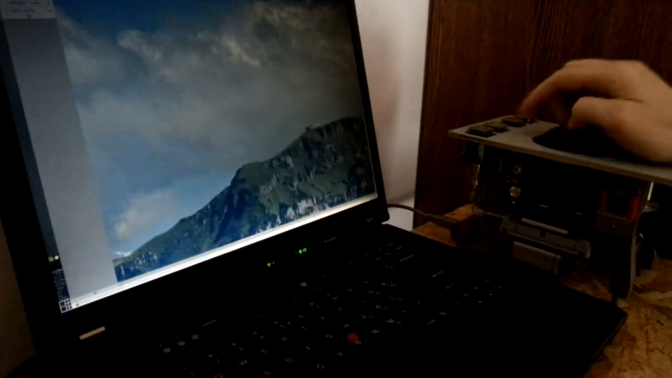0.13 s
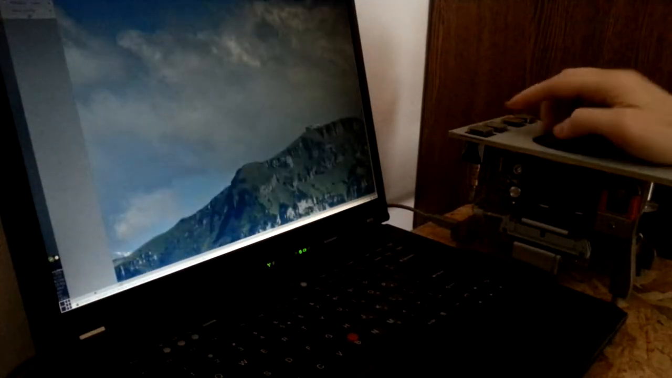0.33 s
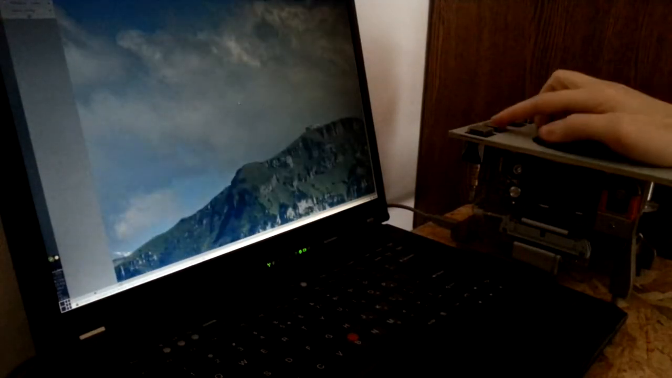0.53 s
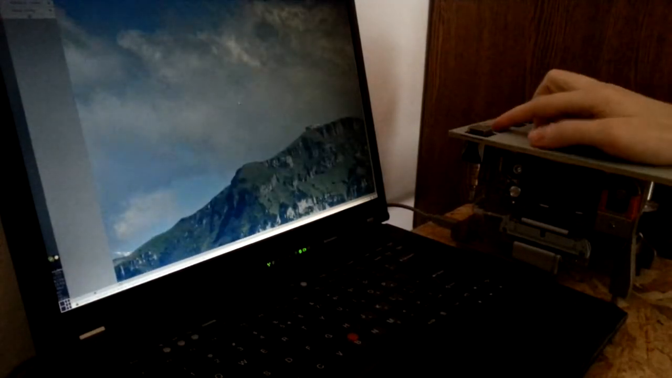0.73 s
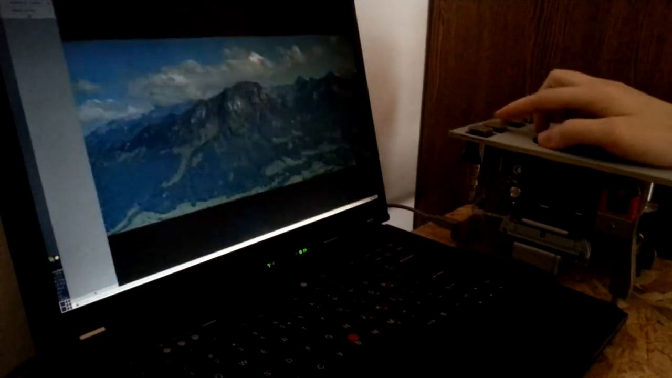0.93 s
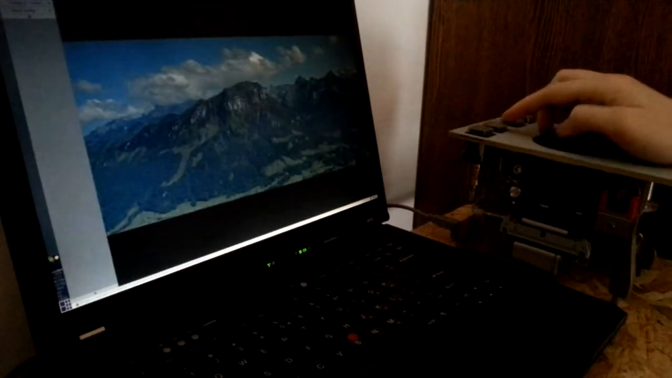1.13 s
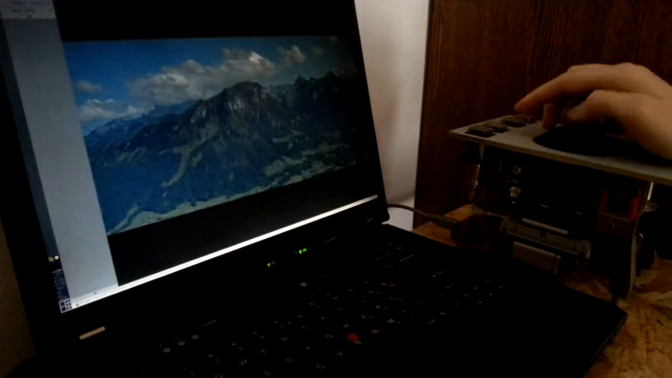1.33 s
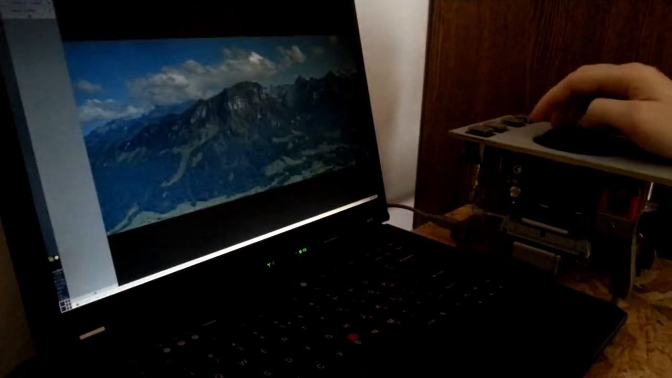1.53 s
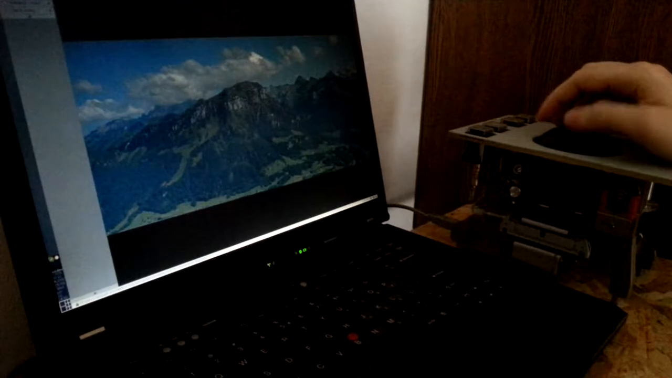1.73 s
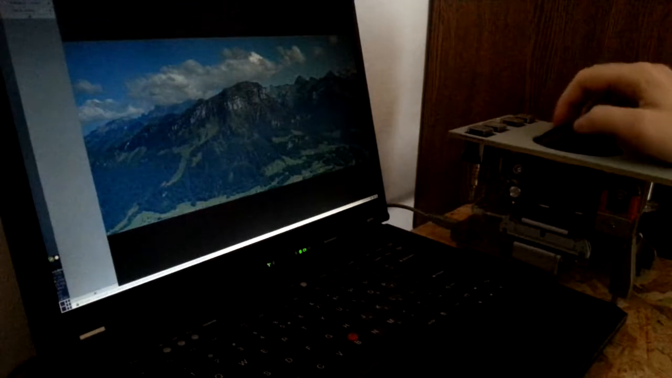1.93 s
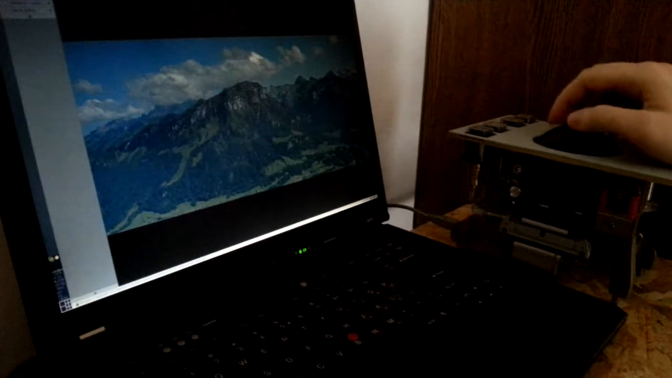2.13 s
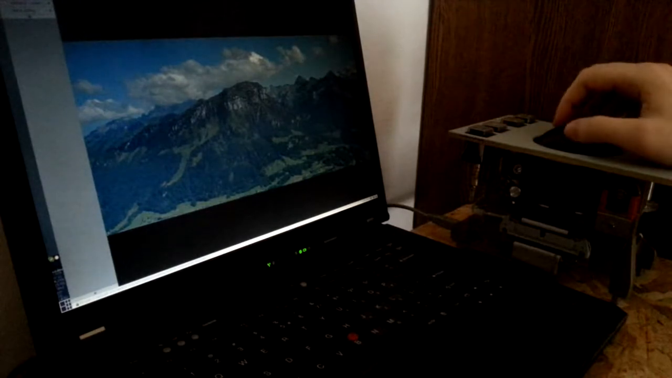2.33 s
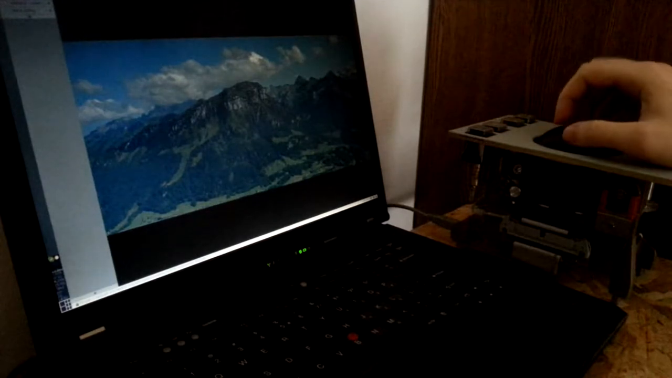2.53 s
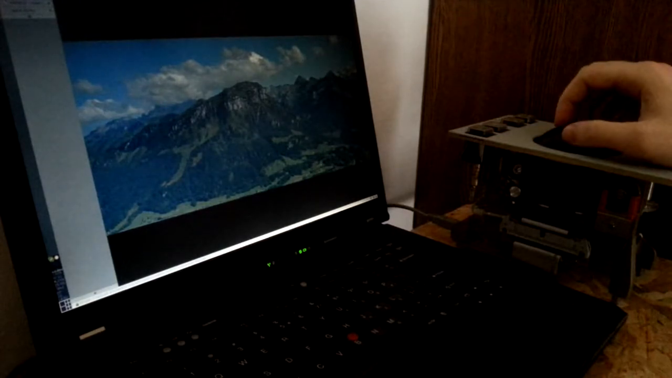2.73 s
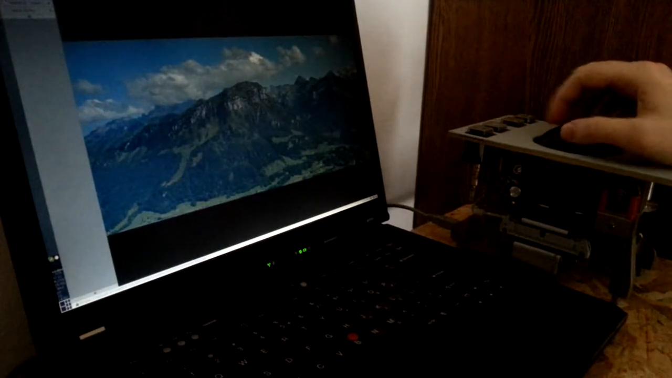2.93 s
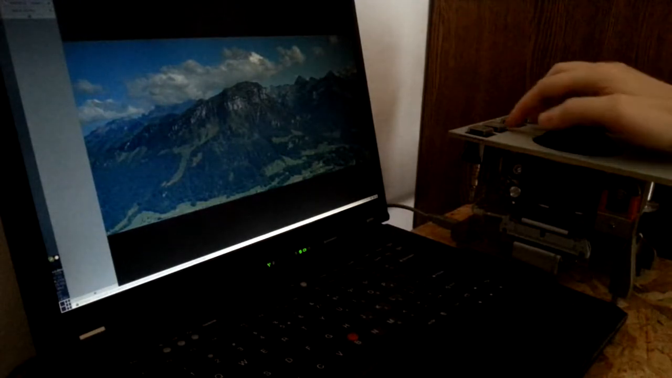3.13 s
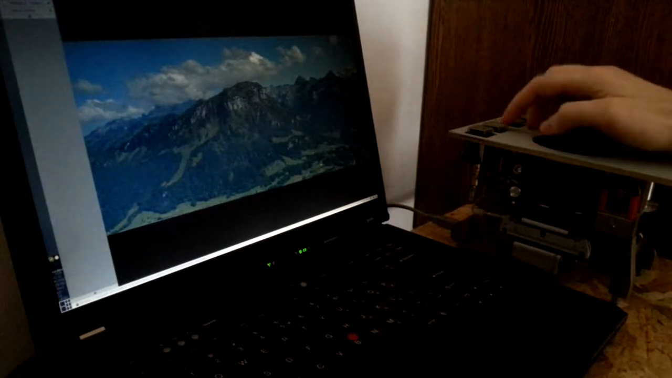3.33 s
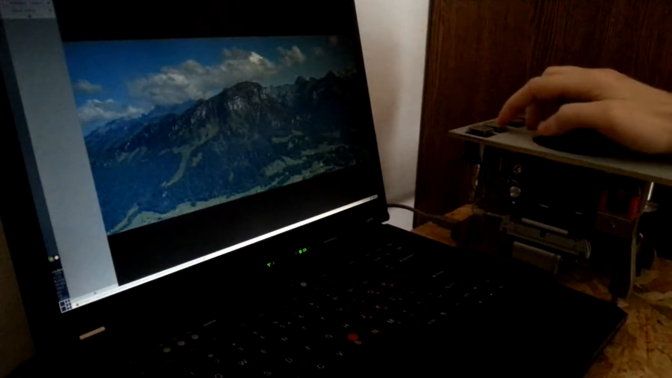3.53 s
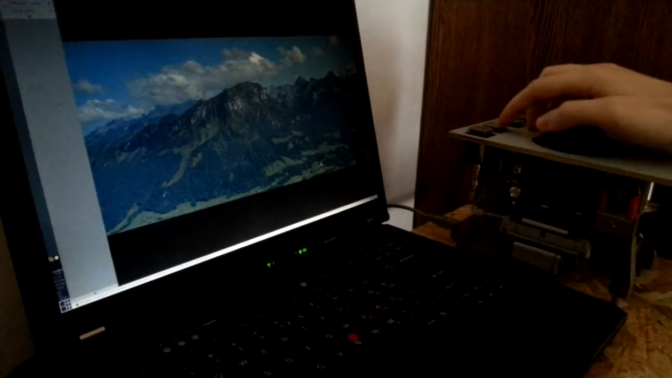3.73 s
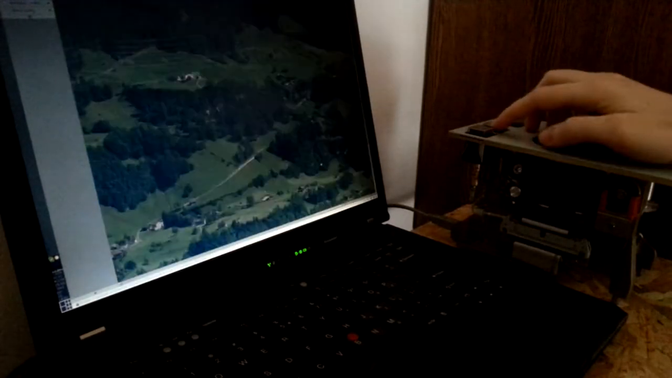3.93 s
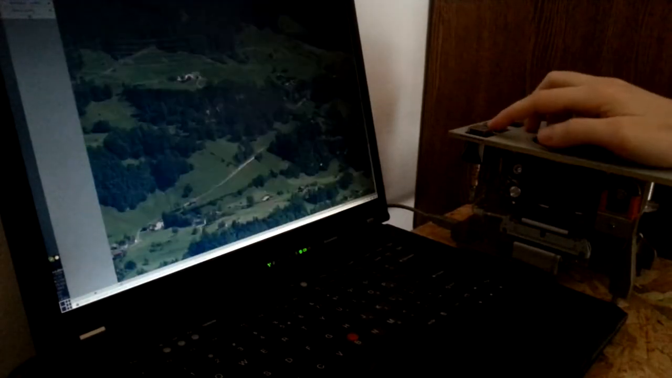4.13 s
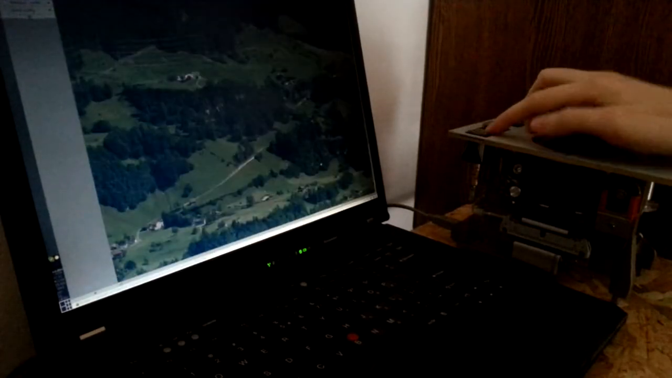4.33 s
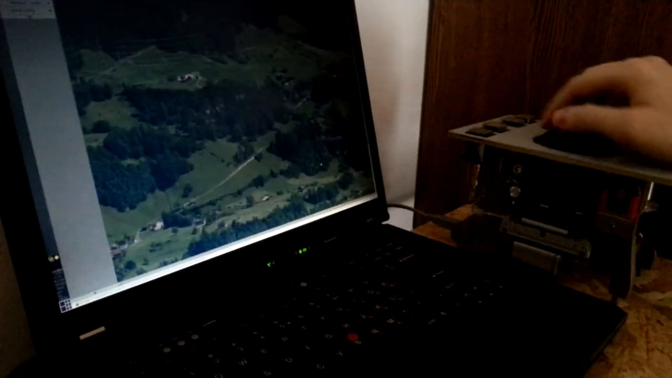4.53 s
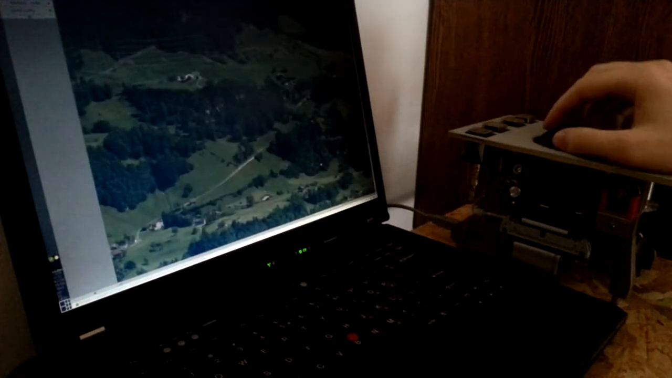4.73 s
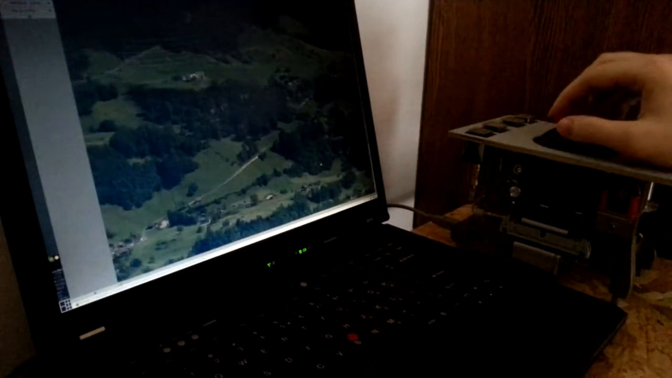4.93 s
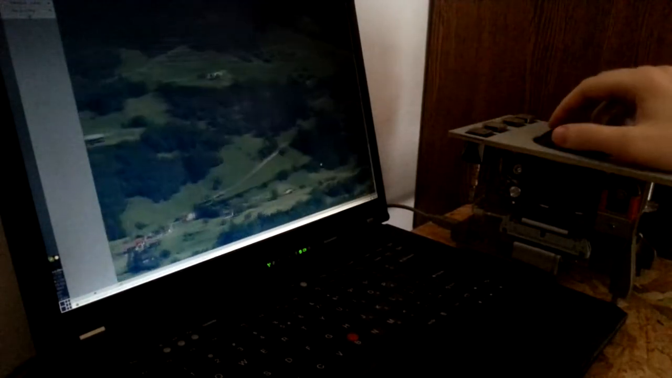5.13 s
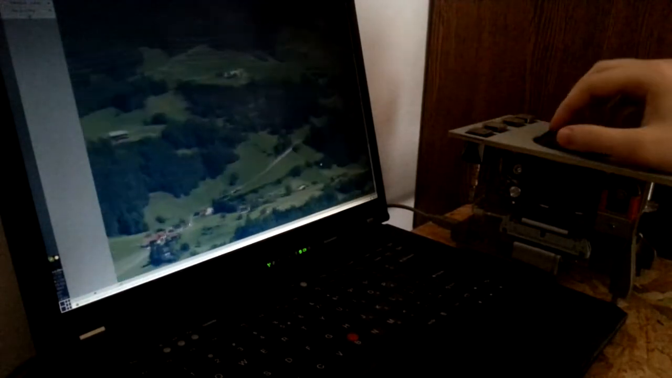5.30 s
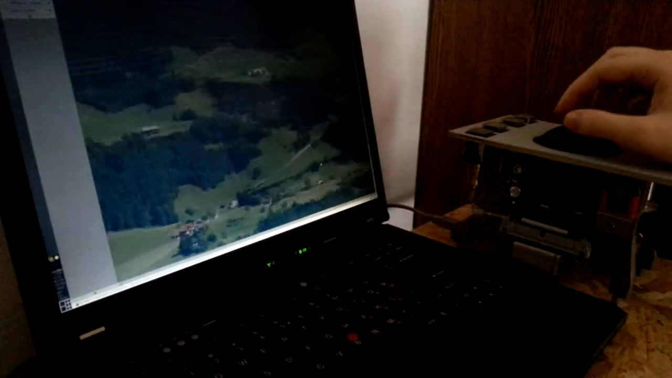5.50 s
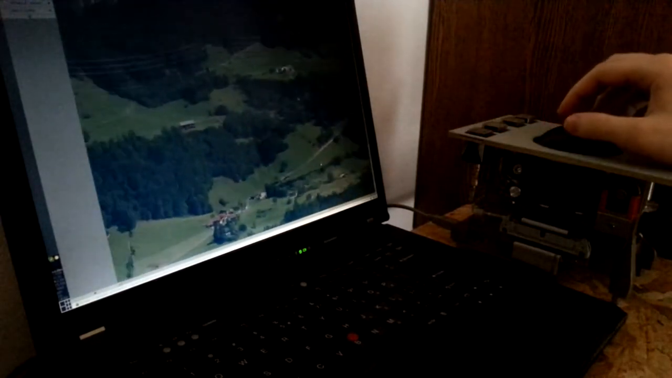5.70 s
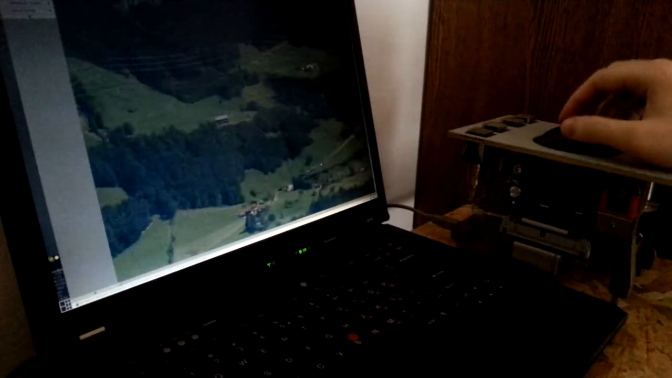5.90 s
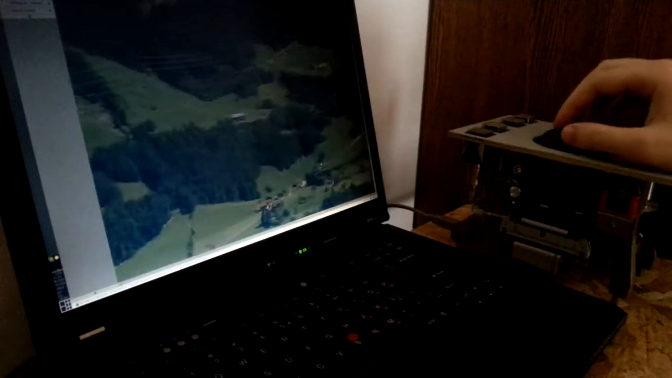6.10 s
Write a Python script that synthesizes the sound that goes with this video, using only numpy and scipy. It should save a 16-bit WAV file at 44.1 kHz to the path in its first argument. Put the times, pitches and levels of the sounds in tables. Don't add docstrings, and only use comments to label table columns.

```python
import sys
import numpy as np
from scipy import signal
from scipy.fft import rfft, irfft
from scipy.io import wavfile
from scipy.ndimage import uniform_filter1d

SR = 44100
rng = np.random.default_rng(int(sys.argv[2]) if len(sys.argv) > 2 else 0)


def materialize(psi):
    bounded = np.clip(np.atleast_2d(psi).T, -1, 1)
    quanta = np.round(bounded * 32767).astype(np.int16)
    wavfile.write(sys.argv[1], SR, quanta)


def magnitude_from_level(level_db):
    exponent = np.asarray(level_db, float) / 20
    return 10 ** exponent


N = 271656

# (frequency [Hz], width [Hz], level [dB])
DESK_MODES = [(165.2, 19.6, -1.5), (196, 12.2, 1), (132.6, 39, -12)]
# (frequency [Hz], width [Hz], level [dB])
PLATE_MODES = [(318.5, 15.6, 4), (353, 39.5, -0.5), (392.5, 14, -7.5), (432, 22, -6), (492, 34, -10.5),
               (532, 36, -15), (547, 39, -22.5), (662, 35, -20)]


def unit(x):
    return x / np.sqrt(np.mean(x ** 2))


def colour(x, points):
    hz, db = np.transpose(points)
    axis_hz = np.maximum(np.fft.rfftfreq(x.shape[-1], 1 / SR), 1)
    gain_db = np.interp(np.log(axis_hz), np.log(hz), db)
    return irfft(rfft(x) * magnitude_from_level(gain_db), x.shape[-1])


def walk(rate_hz):
    hold = int(SR / rate_hz)
    steps = np.repeat(rng.standard_normal(N // hold + 1), hold)
    slewed = uniform_filter1d(uniform_filter1d(steps, hold), hold)
    return unit(slewed[:N])


def swell(t, ms):
    rise = t * 1000 / max(ms, .2)
    return rise * np.exp(1 - rise)


def chatter(count, size):
    return unit(uniform_filter1d(rng.standard_normal(count), size=size))


def add(out, s, hit):
    start = int(s * SR)
    out[:, start:start + hit.shape[1]] += hit


def hiss():
    # (frequency [Hz], density [dB per Hz])
    hiss_shape = [(15, -53), (25, -23), (70, -7), (150, -1), (254, -5.5), (600, -5.5), (1280, -10.5),
                  (2500, -13), (4000, -14), (5300, -9.5), (6500, -14), (9000, -16), (12000, -18),
                  (15700, -18)]
    hiss_db, whine_hz, whine_db = -48.5, 7308, -66
    notch_hz, notch_width_hz, notch_db = 3980, 150, -4
    mid, side = rng.standard_normal((2, N))
    side = colour(side, [(40, -6), (130, -5.5), (300, -0.5), (1000, 0.5)])
    floor = colour(np.array([mid + side, mid - side]), hiss_shape)
    floor = colour(floor, [(notch_hz - notch_width_hz, 0), (notch_hz, notch_db), (notch_hz + notch_width_hz, 0)])
    floor *= magnitude_from_level(hiss_db) / np.std(floor.mean(axis=0))
    whine = np.sin(2 * np.pi * whine_hz * np.arange(N) / SR) * magnitude_from_level(whine_db + 2.0 * walk(4.3))
    return floor + whine


def strokes(t):
    # (start [s], length [s], level [dB], change over the stroke [dB], plate re desk [dB])
    stroke_rows = [(0.071, 0.34, -37, -6.5, 0), (0.955, .12, -48.5, 1, 1), (1.085, 0.34, -40.5, 4, 1),
                   (1.533, 0.35, -40.5, -2, -1), (1.912, .45, -32, -9, 1), (2.415, 0.33, -32, -9, 1),
                   (3.136, 0.18, -45, -6.5, 2.5), (4.606, .05, -43, -7, 5.5),
                   (4.698, 0.086, -45.5, 5.5, -4.5), (4.766, 0.46, -34.5, -15, 0.5),
                   (5.26, 0.56, -32, -5, 0), (5.857, 0.2, -38.5, -10, -1.5), (6.044, 0.14, -35.5, 7.5, -3)]
    push_s, coast_s, coast_db = 0.041, 0.048, -20
    desk, plate = 0, 0
    for s, length_s, db, change_db, plate_db in stroke_rows:
        push = np.clip((t - s) / push_s, 0, 1)
        drift_db = change_db * np.clip((t - s) / length_s, 0, 1)
        after = np.maximum(t - s - length_s, 0) / coast_s
        gain = push * magnitude_from_level(db + drift_db + np.maximum(coast_db * after, -200))
        desk = desk + gain
        plate = plate + gain * magnitude_from_level(plate_db)
    return desk, plate


def pits():
    pits_per_s, pit_db, scatter_db, pit_plate_db = 22, 3, 3, -2
    chance = rng.standard_normal((200, 3))
    s = np.cumsum(np.exp(.3 * chance[:, 0])) / pits_per_s
    desk, plate = strokes(s)
    desk_db = 20 * np.log10(desk + 1e-9) + pit_db + scatter_db * chance[:, 1]
    plate_db = 20 * np.log10((plate + 1e-9) / (desk + 1e-9)) + pit_plate_db + scatter_db * chance[:, 2]
    return [row for row in zip(s, desk_db, plate_db) if row[0] < N / SR and row[1] > -70]


def bumps():
    # (time [s], desk peak [dB], plate re desk [dB])
    deep_dents = [(.125, -38, 7.5), (.15, -30, -3), (.189, -36.5, 6), (.28, -26, -4), (1.266, -37, 7),
                  (1.33, -30, -5), (1.404, -25, -7), (1.571, -32, -17), (1.727, -38, 5.5), (1.924, -30, 0),
                  (2.072, -32, -2), (2.108, -24, -6), (2.145, -27, -9), (2.177, -30.5, 2.5),
                  (2.438, -32, 9), (2.474, -24, -2), (2.512, -23.5, -15), (2.768, -36, -14),
                  (3.139, -31.5, -7), (3.192, -38, -15), (3.272, -43, 8), (3.391, -28, -8.5),
                  (4.814, -24.5, -3), (4.848, -30, -2), (5.045, -28, -1.5), (5.367, -29, -7),
                  (5.424, -30.5, 7), (5.457, -24, 0), (5.712, -20.5, -11), (6.125, -23.5, -7.5)]
    desk_swell_ms, plate_swell_ms, bumps_db = 9.5, 7, -1.5
    out, t = np.zeros(N + SR), np.arange(SR // 10) / SR
    dents = deep_dents + pits()
    phases = rng.random((250, 2, 8, 1))
    for (s, desk_db, plate_db), (desk_phase, plate_phase) in zip(dents, phases):
        start = int(s * SR)
        bodies = ((DESK_MODES, desk_db, desk_swell_ms, desk_phase),
                  (PLATE_MODES, desk_db + plate_db, plate_swell_ms, plate_phase))
        for modes, db, ms, phase in bodies:
            hz, _, mode_db = (c[:, None] for c in np.transpose(modes))
            partials = magnitude_from_level(mode_db) * np.sin(2 * np.pi * (hz * t + phase[:len(hz)]))
            tone = np.sum(partials, axis=0) * swell(t, ms)
            out[start:start + len(t)] += magnitude_from_level(db + bumps_db) * tone / np.max(np.abs(tone))
    return out[:N]


def ring(x, modes):
    out = 0
    for k, (hz, width_hz, db) in enumerate(modes):
        pole = np.exp((2j * np.pi * hz - np.pi * width_hz) / SR)
        mode = signal.lfilter([1], [1, -pole], x).imag
        out = out + (-1) ** k * magnitude_from_level(db) * width_hz * mode
    return unit(out)


def ball():
    # (frequency [Hz], width [Hz], level [dB])
    bearing_modes = [(1108, 40, 6.2), (1185, 65, 9.5), (1325, 97, 5.9), (1437, 50, 11.6), (1700, 430, 0.4)]
    bump_hz, bump_db, rough_db = 29.82, -0.5, -5
    whirr_db, left_db = -20.5, -2.2
    force = rng.standard_normal(N) * magnitude_from_level(bump_db * walk(bump_hz))
    desk, plate = strokes(np.arange(N) / SR)
    rolling = desk * magnitude_from_level(rough_db) * ring(force, DESK_MODES)
    rolling += plate * magnitude_from_level(rough_db) * ring(force, PLATE_MODES)
    rolling += plate * magnitude_from_level(whirr_db + 3.06 * walk(45)) * ring(force, bearing_modes)
    return (rolling + bumps()) * magnitude_from_level(np.array([[left_db], [-left_db]]) / 2)


def clock():
    # (time [s], level [dB], rattle length [ms])
    tick_rows = [(0.639, -43, 26), (0.655, -45, 84), (1.613, -44.5, 38), (1.638, -44, 25), (1.662, -42, 36),
                 (2.63, -49, 44), (2.659, -38.5, 27.8), (4.646, -44.5, 27), (4.664, -42, 18),
                 (5.64, -42.5, 30), (5.662, -39.5, 25)]
    # (frequency [Hz], density [dB per Hz])
    tick_shape = [(1800, -22), (2700, -8.5), (3500, -8.5), (4100, -9.5), (5000, -5), (6500, -10),
                  (8500, -20), (11000, -38)]
    t, gate = np.arange(N) / SR, np.zeros(N)
    for s, db, length_ms in tick_rows:
        since_ms = np.maximum(t - s, 0) * 1000
        gate += magnitude_from_level(db) * np.minimum(since_ms / 1.8, 1) * np.exp(-since_ms / length_ms)
    return gate * unit(colour(rng.standard_normal((2, N)), tick_shape))


def strike(modes, near_hz, width_oct, ms, spread, count=6):
    cluster_spread, scatter_db, fall_db = .035, 2, 5
    t = np.arange(SR // 8) / SR
    hz, db, t60 = (np.repeat(c, count)[:, None] for c in np.transpose(modes))
    chance = rng.standard_normal((4, len(hz), 1))
    away = np.log2(hz / near_hz) / width_oct
    db = db - fall_db * np.minimum(away ** 2, 2) + scatter_db * chance[0]
    heard = db[:, 0] > db.max() - 30
    hz, db, t60, chance = hz[heard], db[heard], t60[heard], chance[:, heard]
    cluster = count > 1
    mode_hz = hz * (1 + cluster_spread * cluster * chance[1])
    turn = 2 * np.pi * (mode_hz * t + cluster * chance[3])
    wave = np.exp((1j * turn - np.log(1000) * t / t60).astype(np.complex64))
    ports = []
    for ear in (1, -1):
        weight = magnitude_from_level(db) * np.exp(1j * ear * spread * chance[2])
        ports.append(weight[:, 0].astype(np.complex64) @ wave)
    attack = (1 - np.exp(-t * 1000 / max(ms, .05))) ** 2
    return np.array(ports).imag * attack / np.sqrt(np.sum(magnitude_from_level(db) ** 2))


def contact(top_db, frame_db, ring_hz, frame_hz, crack_db, ms):
    # (frequency [Hz], level [dB], t60 [s])
    snap_modes = [(2750, -19, .08), (3060, -26.5, 0.24), (3210, 12, 0.19), (3303, 26, 0.067),
                  (3600, 14.5, 0.12), (3705, 17, 0.11), (4000, -26, 0.059), (4570, -20, 0.066),
                  (4670, -8.5, 0.1), (4860, 28.5, 0.047), (4380, 9, 0.07), (5300, 0, 0.11),
                  (5920, 12, 0.091), (5680, 31, 0.021), (6530, 35, 0.029), (7230, 21.5, 0.056)]
    # (frequency [Hz], level [dB], t60 [s])
    frame_modes = [(827, 6, 0.18), (890, -21, 0.19), (1198, -4, 0.2), (1289, 16.5, 0.038),
                   (1416, 14.5, 0.052), (1611, 3.5, 0.13), (1828, -5.5, 0.12), (1984, 14, 0.022),
                   (2164, 14, 0.085), (2392, 9, 0.16)]
    # (frequency [Hz], density [dB per Hz])
    crack_shape = [(2000, -2), (5000, 0.5), (8000, -3.5), (11000, -8), (15500, -20.5)]
    grit, crack_ms = 0.71, 19.5
    hit = magnitude_from_level(top_db + 8) * strike(snap_modes, ring_hz, .4, ms, 0.84)
    hit += magnitude_from_level(frame_db + 4.5) * strike(frame_modes, frame_hz, 0.48, ms, 0.69)
    t = np.arange(hit.shape[1]) / SR
    hit *= 1 + grit * chatter(len(t), 40)
    crack = unit(colour(rng.standard_normal((2, len(t))), crack_shape))
    crack *= swell(t, ms) * np.exp(-t * 1000 / crack_ms)
    return hit + magnitude_from_level(top_db + crack_db) * crack


def knocks(out):
    # (time [s], thud peak [dB], frame re thud [dB], scrape re thud [dB], contact [ms])
    knock_rows = [(.723, -13, -3.5, -47, 0.45), (.754, -6.5, -14, -40, 1.2), (0.864, -16, -10, -13, 5),
                  (.876, -8, -26, -44, 0.57), (3.127, -27.5, -9.5, -15, 1.6), (3.182, -26.5, -15, -21, 1),
                  (3.586, -33, -7, -20, 6.6), (3.604, -27.5, 8, -1, 8.2), (3.621, -9, -26, -40, 0.11),
                  (3.752, -8, -23, -42, 0.59), (4.218, -37, 10, 2, 5.3), (4.236, -12.5, -0.5, -21, 0.32),
                  (4.254, -33, -15, 11, 2.6), (4.264, -6.5, -20, -44, 1.7), (4.355, -13, -14.5, -23, 6),
                  (4.398, -8.5, -42, -40, 0.95), (4.619, -43, -6, -30, 6.5), (5.712, -24.5, -10, -37, 5.05)]
    # (frequency [Hz], level [dB], t60 [s])
    thud_modes = [(193, 0.5, 0.12), (336, -0.5, 0.088), (398.2, -8, 0.059), (458, -9.5, 0.099),
                  (495, -6.5, 0.038), (575, -13, 0.11), (625, 1.5, 0.08), (688, -7.5, .06)]
    finger_ms, thud_near_hz = 15, 423
    t = np.arange(SR // 8) / SR
    for s, thud_db, frame_db, scrape_db, ms in knock_rows:
        scrape = contact(thud_db + scrape_db, thud_db + frame_db, 4000, 920, -1, ms)
        add(out, s, scrape * np.exp(-t * 1000 / (finger_ms + 2 * ms)))
        add(out, s, magnitude_from_level(thud_db - 3) * strike(thud_modes, thud_near_hz, 0.45, 0.57 * ms, 0.26, count=1))


def snaps(out):
    # (time [s], snap peak [dB], frame re snap [dB], brightest ring [Hz], contact [ms])
    click_rows = [
        (.752, -12, 0, 4000, 2.5),
        (.875, -17, 4, 4500, 2.5),
        (3.62, -8.5, 3.5, 4000, 2.94),
        (3.751, -19, 8, 4500, 1.9),
        (4.264, -12.5, -3.5, 5170, 3.3),
        (4.397, -13, -6, 3560, 0.32),
    ]
    frame_near_hz, sharp_lift_hz, crack_db = 1380, 300, 3.5
    for s, snap_db, frame_db, ring_hz, ms in click_rows:
        frame_hz = frame_near_hz + sharp_lift_hz / ms
        add(out, s, contact(snap_db, snap_db + frame_db, ring_hz, frame_hz, crack_db, ms))


def rings(out):
    # (time [s], peak [dB], frequency [Hz], t60 [s])
    ring_rows = [(0.95, -42, 505, 0.66), (3.78, -40, 486, 0.76), (4.43, -38.5, 490, 0.57),
                 (0.76, -26, 4640, .2), (0.88, -28.5, 4560, 0.14), (3.623, -22, 5500, 0.21),
                 (3.754, -30, 4630, 0.18), (3.754, -17, 4300, 0.039), (4.266, -4.5, 5200, 0.022),
                 (4.266, -11, 5280, 0.033), (4.267, -24, 6900, 0.041), (4.399, -17, 4720, 0.07),
                 (4.236, -29, 1350, 0.033), (0.72, -42, 6200, 0.063), (2.065, -43, 2950, 0.056),
                 (4.82, -42, 3500, 0.056), (4.397, -8.5, 5880, 0.032), (4.398, -22, 3000, 0.064),
                 (4.397, -27, 8800, 0.063), (4.40, -19.5, 329, 0.123), (3.186, -44, 3700, 0.068)]
    beat, rattle_t60_s = 0.0123, .12
    t = np.arange(SR // 2) / SR
    for s, db, hz, t60 in ring_rows:
        turn = 2 * np.pi * hz * t
        ear = np.array([[1], [-1]]) * hz / 5000
        pair = np.sin(turn + ear) + 0.79 * np.sin(turn * (1 + beat) - ear)
        if t60 < rattle_t60_s:
            pair = pair * chatter(len(t), 70)
        add(out, s, magnitude_from_level(db - 60 * t / t60) * pair * np.minimum(turn / 40, 1))


def tinks(out):
    # (time [s], peak [dB])
    tink_rows = [
        (3.126, -30),
        (3.137, -29.5),
        (3.186, -40),
        (3.213, -58),
    ]
    # (frequency [Hz], level [dB], t60 [s])
    tab_modes = [(3400, -1.5, .08), (3455, -3, 0.082), (3605, -5, 0.063), (3560, -11, 0.079),
                 (2520, -4, 0.027)]
    for s, db in tink_rows:
        add(out, s, magnitude_from_level(db) * strike(tab_modes, 3450, 3.0, 0.89, 0.51, count=2))


def buttons():
    out = np.zeros((2, N + SR))
    knocks(out)
    snaps(out)
    rings(out)
    tinks(out)
    return out[:, :N] * magnitude_from_level(np.array([[-1.2], [1.2]]) / 2)


def jolts():
    # (time [s], peak [dB])
    jolt_rows = [
        (.755, -60),
        (3.622, -50),
        (4.262, -58),
        (6.12, -60),
    ]
    jolt_hz = 30
    out, t = np.zeros((2, N + SR)), np.arange(SR // 5) / SR
    shake = np.sin(2 * np.pi * jolt_hz * t) * swell(t, 15.0)
    for s, db in jolt_rows:
        add(out, s, magnitude_from_level(db) * shake[None])
    return out[:, :N]


def room(x, db):
    # (band centre [Hz], t60 [s], level [dB])
    room_bands = [(129, 0.48, -0.5), (507, 0.3, 2), (1560, 0.36, -3.5), (4500, 0.3, 0), (8050, 0.28, -2),
                  (13800, 0.23, 0)]
    t = np.arange(SR // 2) / SR
    centres = np.log(np.array(room_bands)[:, 0])
    axis = np.log(np.fft.rfftfreq(len(t), 1 / SR) + 1)
    tail = 0
    for own, (hz, t60, band_db) in zip(np.eye(len(centres)), room_bands):
        mid, side = rng.standard_normal((2, len(t)))
        side = side * min(hz / 1600, 1)
        gain = np.sqrt(np.interp(axis, centres, own))
        band = irfft(rfft([mid + side, mid - side]) * gain)
        tail = tail + band * magnitude_from_level(band_db - 60 * t / t60)
    tail *= np.clip((t - .002) / 0.00067, 0, 1)
    tail /= np.sqrt(np.sum(tail ** 2) / 2)
    return x + magnitude_from_level(db) * signal.fftconvolve(x, tail, axes=1)[:, :N]


def scene():
    room_db, roll_room_db, low_cut_hz = -7.5, -3.5, 147
    near = room(buttons(), room_db) + room(ball(), roll_room_db)
    near = signal.sosfilt(signal.butter(4, low_cut_hz, "high", fs=SR, output="sos"), near)
    return near + jolts() + clock() + hiss()


def band_limit(x):
    return signal.sosfilt(signal.butter(12, 15810, fs=SR, output="sos"), x)


def record(dry):
    ceiling = 2
    mix = np.clip(ceiling * np.tanh(dry / ceiling), -1, 1)
    return band_limit(mix)


dry = scene()
out = record(dry)
materialize(out)
```